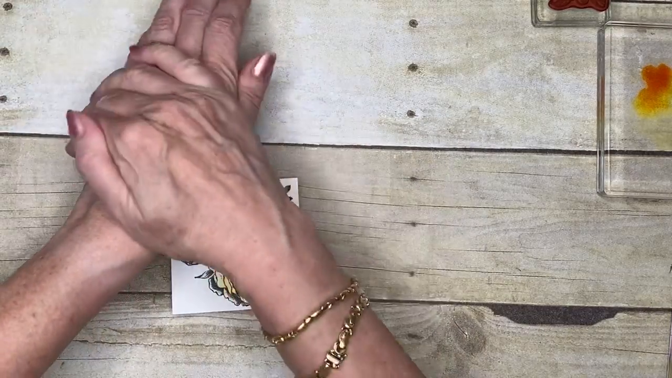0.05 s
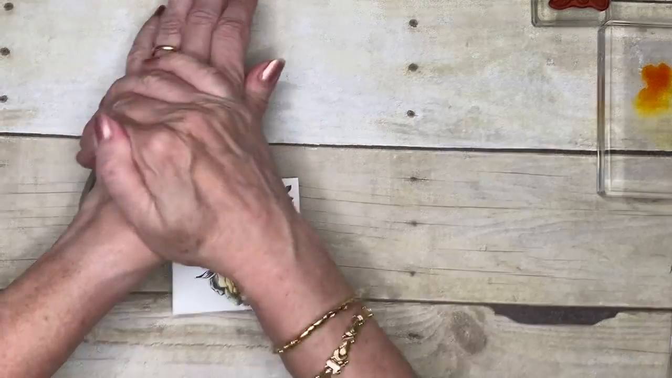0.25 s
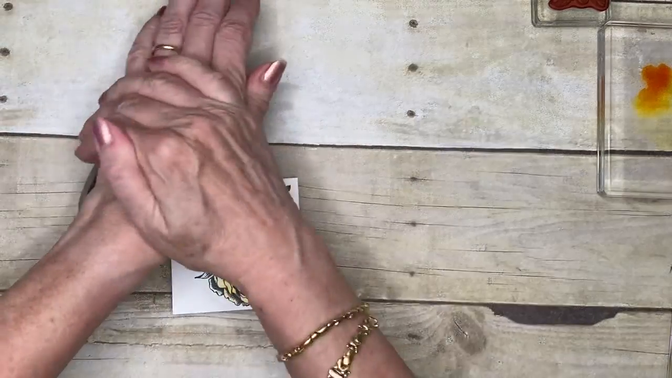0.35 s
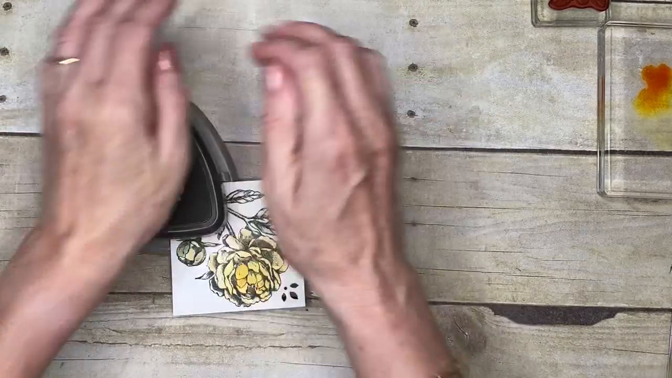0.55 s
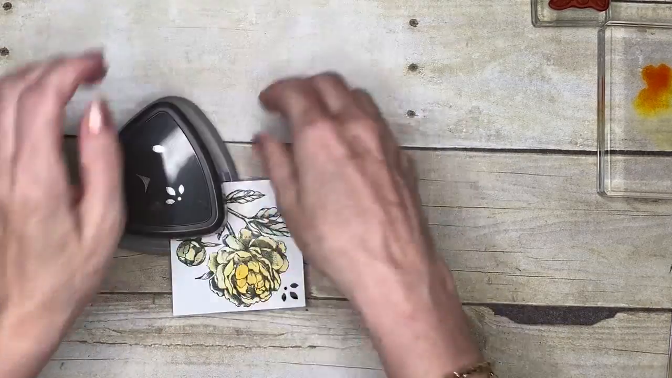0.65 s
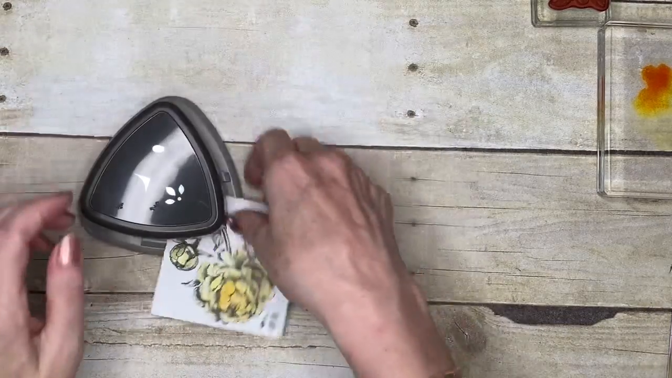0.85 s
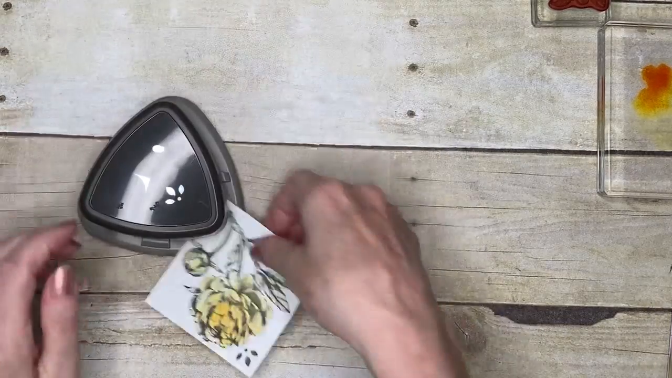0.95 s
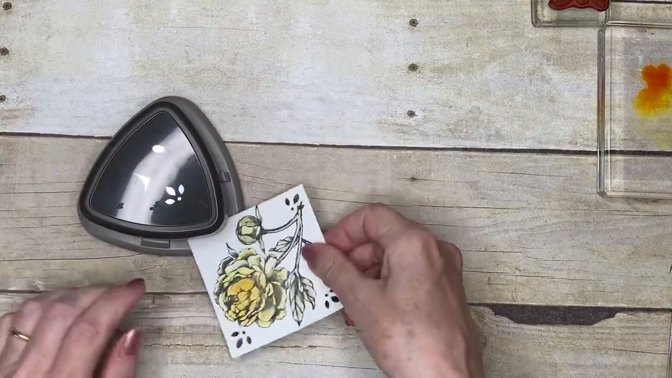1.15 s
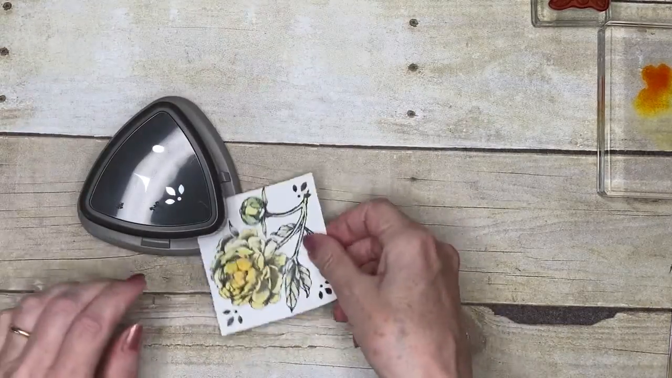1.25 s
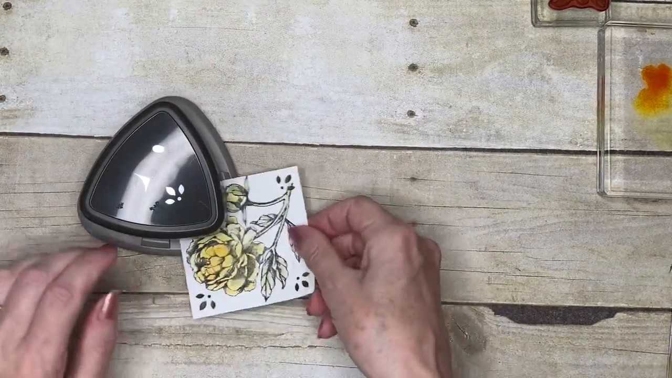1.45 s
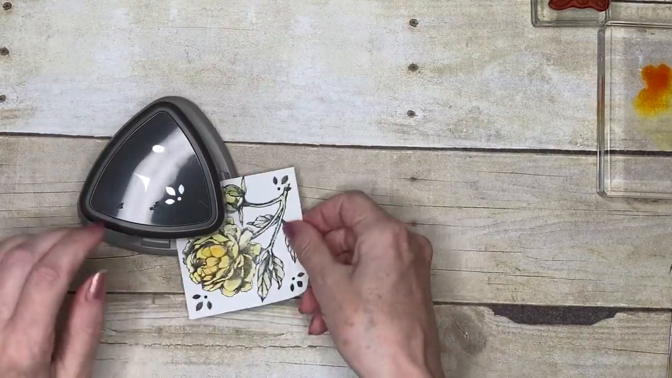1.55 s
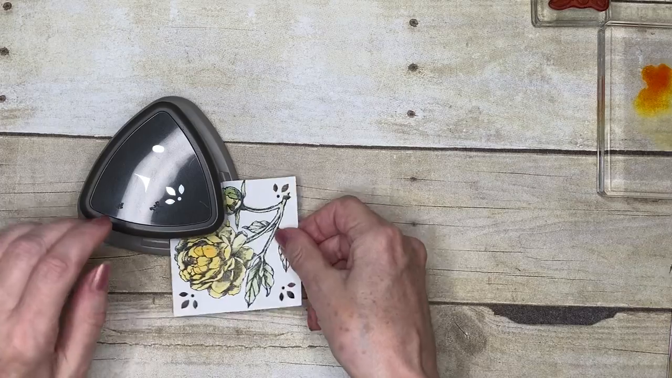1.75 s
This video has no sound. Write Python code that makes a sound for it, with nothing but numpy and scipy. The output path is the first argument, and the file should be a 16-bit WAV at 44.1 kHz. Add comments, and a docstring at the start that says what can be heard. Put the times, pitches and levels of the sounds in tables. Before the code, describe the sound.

One hard, hollow plastic clack with a low wooden thud, a quieter spring-back click, then light papery sliding and tiny edge taps against the punch, heard close in stereo in an indoor room with faint low rumble.

```python
"""Corner punch on a craft table

A plastic corner punch is pressed through a card: the die snaps through, the lever bottoms out and thumps
the table, then springs back while its spring rings faintly. The card is slid out, turned and tapped back in.
Knocks and rubs ring the modes of the plastic shell, pushes boom in the table top, gritty friction drives the
sliding card. A room answers in stereo, over a low rumble and very faint air.
"""
import sys
import numpy as np
from scipy import signal
from scipy.fft import rfft, irfft, next_fast_len
from scipy.io import wavfile
from scipy.ndimage import uniform_filter1d, minimum_filter1d, map_coordinates

SR = 44100
rng = np.random.default_rng(int(sys.argv[2]) if len(sys.argv) > 2 else 0)


def master(y):
    """Save y as 16-bit WAV."""
    cut = np.clip(np.atleast_2d(y).T, -1, 1)
    pcm = np.round(cut * 32767)  # scale
    wavfile.write(sys.argv[1], SR, pcm.astype(np.int16))


N = 79380  # samples, 1.8 s

# ringing modes of the plastic shell: pitch_hz, level_db, t60_s
SHELL_MODES = [(507, -2, 0.027), (759.7, 5, 0.013), (970, 4.5, .02), (1117.4, 1.5, 0.026), (1309, 8, 0.016),
               (1525.5, 2.5, 0.013), (1950, 8.5, 0.01), (2280, 4.5, .018), (2660, 9.5, 0.017),
               (2970, 8, 0.011), (3400, -3.5, 0.025), (3936, -6.5, 0.0055), (4400, -8.5, .008)]
# spectrum of the high hiss of card friction: frequency_hz, level_db
HISS_COLOUR = [(3500, -9.5), (5500, -14.5), (7500, -5), (10500, -5.5), (13000, -11.5), (16500, -10.5)]


def amp(db):
    """dB to gain."""
    return 10 ** (np.asarray(db) / 20)


def unit(x):
    """Scaled to rms 1."""
    return x / np.sqrt(np.mean(x ** 2) + 1e-20)


def along(points, hz):
    """Values at hz, read between (Hz, value) points on a log frequency axis."""
    point_hz, values = np.transpose(points)
    return np.interp(np.log(hz + 1), np.log(point_hz + 1), values)


def closeness(hz, centre_hz, reach_oct):
    """Bell curve around a centre frequency; reach is its standard deviation in octaves."""
    return np.exp(-.5 * (np.log2(hz / centre_hz) / reach_oct) ** 2)


def filtered(x, response):
    """Multiplies the spectrum of x by a complex response of frequency."""
    size = next_fast_len(x.shape[-1] + 8192)
    spectrum = rfft(x, size) * response(np.fft.rfftfreq(size, 1 / SR))
    return irfft(spectrum, size)[..., :x.shape[-1]]


def coloured(points, channels=1):
    """Noise of rms 1 with the given spectrum, cut off below half its lowest point."""
    lowest_hz = points[0][0]
    gain = lambda hz: amp(along(points, hz)) * (hz > lowest_hz / 2)
    return unit(filtered(rng.standard_normal((channels, N)), gain))


def wobble(rate, count):
    """Smooth random curves through rate knots a second."""
    knots = rng.standard_normal((count, int(N * rate / SR) + 4))
    return np.array([map_coordinates(k, [np.arange(N) * rate / SR]) for k in knots])


def background():
    """A low rumble, mostly shared by the channels, and a very faint air in both alike."""
    # spectrum of the rumble: frequency_hz, level_db
    rumble_colour = [(12, -52.5), (20, -8), (65, -1.5), (112, -8), (151, -9.5), (200, -19.5), (235, -28),
                     (276, -25.5), (500, -40.5), (650, -72.5), (1100, -120)]
    # spectrum of the air: frequency_hz, level_db
    air_colour = [(300, -6.5), (1200, -7), (3000, -11.5), (6500, -24), (10000, -12), (13000, -17.5),
                  (16000, -25.5)]
    rumble_db, air_db = -59.5, -74.5
    rumble = coloured(rumble_colour) + 0.15 * coloured(rumble_colour, channels=2)
    return amp(rumble_db) * unit(rumble) + amp(air_db) * coloured(air_colour)


def table():
    """The table top booms after each push: its damped modes near a centre build up and die away."""
    # pushes into the table top: start_s, level_db, centre_hz, reach_oct, direction
    pushes = [(-.012, -31.5, 56, 0.94, 1), (0.0112, -34.5, 175, 0.2, -1), (0.2026, -7, 102, 1.22, -1),
              (0.4181, -22, 165, 0.25, 1), (0.445, -25, 66.5, 0.27, 1), (0.588, -48.5, 69.4, 0.67, 1),
              (0.757, -47.5, 158.6, 0.33, 1), (0.817, -48, 153.4, 0.38, 1)]
    # modes of the table top: pitch_hz, level_db, t60_s
    modes = [(60, 0.5, 0.32), (128.52, 4.5, 0.1), (174.5, 0.5, .15), (222.4, -10, 0.28), (279, -3, .12)]
    rise_s, wander_rad = 0.0058, 0.18
    out = np.zeros(N + 2 * SR)  # a second of lead-in, as the first push starts before zero
    t = np.arange(SR // 2) / SR
    hz, level_db, t60 = np.transpose(modes)[:, :, None]
    for start_s, db, centre_hz, reach_oct, direction in pushes:
        wander = wander_rad * wobble(25, count=len(modes))[:, :len(t)]
        gains = closeness(hz, centre_hz, reach_oct) * amp(level_db - 60 * t / t60)
        boom = np.sum(gains * np.cos(2 * np.pi * hz * t + wander), 0)
        rise = 1 - np.exp(-(t / rise_s) ** 2)
        at = round((start_s + 1) * SR)
        out[at:][:len(t)] += np.sign(direction) * amp(db) * rise * boom
    return out[SR:][:N]


def rubs():
    """Creaks of the lever and scuffs of the card: spiky friction noise drives shell modes near a centre."""
    # creaks and scuffs: start_s, length_s, level_db, growth_db, centre_hz, hiss_db (relative to the rub)
    rub_rows = [(0, 0.019, -62, -3, 1850, -3.5), (0.173, 0.031, -41.5, 14, 1570, -24),
                (0.407, 0.057, -44, 8.5, 2210, -6.5), (.63, .01, -71.5, -7, 4400, 13),
                (0.752, 0.021, -70.5, 9.5, 1400, 11.5), (1.038, .018, -68.5, -3, 1800, 10),
                (0.751, .055, -56.5, -5, 1300, -11), (0.813, 0.03, -52, -15, 985, -14.5),
                (0.93, .11, -60, 1.5, 2357, -27.5), (1.095, 0.046, -58.5, -5.5, 2200, -17),
                (1.355, 0.05, -59.5, -6, 1113, -11), (1.451, 0.052, -69, 11, 1010, -12),
                (1.629, 0.041, -61.5, -2, 2594, -5)]
    reach_oct = 0.19
    out = np.zeros(N + SR)
    hz, _, t60 = np.transpose(SHELL_MODES)[:, :, None]
    t = np.arange(SR // 20) / SR
    hiss = coloured(HISS_COLOUR)[0]
    for start_s, length_s, db, growth_db, centre_hz, hiss_db in rub_rows:
        progress = np.arange(round(length_s * SR)) / (length_s * SR)
        fade = np.clip(np.minimum(progress, 1 - progress) * 10, 0, 1)
        shape = amp(db + growth_db * (progress - .5)) * fade
        near = closeness(hz, centre_hz, reach_oct)
        ring = np.sum(near * amp(-60 * t / t60) * np.sin(2 * np.pi * hz * t), 0)
        drive = rng.standard_normal(len(progress)) ** 3 / np.sqrt(15)  # cubed: spiky, rms near 1
        sound = signal.fftconvolve(shape * drive, ring / np.linalg.norm(ring))
        at = round(start_s * SR)
        sound[:len(progress)] += amp(hiss_db) * shape * hiss[at:at + len(progress)]
        out[at:at + len(sound)] += sound
    return out[:N]


def knocks(rows):
    """Each knock rings the shell modes near its centre and adds a short bright snap."""
    # spectrum of the snap: frequency_hz, level_db
    snap_colour = [(2500, -7), (4000, -4.5), (6000, -13), (8000, -5), (10500, -2.5), (12500, -7.5),
                   (15000, -23.5), (16500, -20)]
    # spectrum of the top of the snap: frequency_hz, level_db
    sizzle_colour = [(9000, -16.5), (12000, -6), (15200, -4.5), (16500, -18)]
    snap_t60, rise_s = 0.011, 0.00093  # the rise is the contact time
    sizzle_db, sizzle_grows = -4, 0.5  # over the snap at a 0 dB blow; dB lost per dB of a weaker blow
    out, t = np.zeros(N + SR), np.arange(SR // 8) / SR
    hz, mode_db, t60 = np.transpose(SHELL_MODES)[:, :, None]
    fizz, sizzle = coloured(snap_colour)[0], coloured(sizzle_colour)[0]
    for start_s, db, centre_hz, reach_oct, snap_db in rows:
        near = closeness(hz, centre_hz, reach_oct)
        gains = near * amp(mode_db + 2 * rng.standard_normal(hz.shape))  # each knock excites them unevenly
        modes = gains * amp(-60 * t / t60) * np.sin(2 * np.pi * hz * t)
        ring = np.sum(modes, 0) / np.linalg.norm(near)
        at = round(start_s * SR)
        bright = fizz + amp(sizzle_db + sizzle_grows * db) * sizzle
        snap = amp(snap_db - 60 * t / snap_t60) * np.roll(bright, -at)[:len(t)]
        out[at:at + len(t)] += amp(db) * (1 - np.exp(-t / rise_s)) * (ring + snap)
    return out[:N]


def spring():
    """Two faint decaying lines of the spring, stopped when the card is pulled."""
    # lines of the spring: pitch_hz, level_db
    lines = [(926, -63), (1007, -62)]
    start_s, rise_s, stop_s, t60, stop_fade_s = .445, .1, .76, 4, 0.0074
    t = np.arange(N) / SR - start_s
    rise = np.clip(t / rise_s, 0, 1) ** 2
    stop = np.clip((stop_s - start_s - t) / stop_fade_s, 0, 1)
    tones = sum(amp(db) * np.sin(2 * np.pi * hz * t) for hz, db in lines)
    return rise * stop * amp(-60 * t / t60) * tones


def slide():
    """Gritty friction of the card excites broad resonances and a high hiss, each part swelling on its own."""
    # course of the sliding card: time_s, scrape_db, hiss_db
    course = [(0.598, -83, -91.5), (.745, -90.5, -92), (0.761, -71.5, -78.5), (.85, -60, -64.5),
              (.9, -64.5, -64), (.95, -64.5, -64), (1.03, -65.5, -69), (1.139, -61, -68.5),
              (1.174, -87.5, -87.5), (1.195, -77, -98), (1.211, -67, -67.5), (1.301, -65, -69),
              (1.38, -59.5, -72), (1.429, -75.5, -88), (1.488, -64, -71), (1.534, -69.5, -80.5),
              (1.575, -69.5, -76), (1.605, -70.5, -96.5), (1.659, -62, -77), (1.71, -92.5, -96),
              (1.8, -98, -95)]
    # resonances of the scrape: centre_hz, width_hz, level_db
    resonances = [(1036, 170, 1.5), (1860, 450, -3.5), (2630, 460, 1), (3993, 2200, -16)]
    # parts of the hiss that swell separately: centre_hz
    patch_hz = np.array([4773, 7700, 12000, 15000])[:, None]
    grit_per_s, grit_db, grit_share = 1500, 3, .6
    flutter_db, flutter_per_s, patch_oct = 4.5, 30, 0.75
    time_s, scrape_db, hiss_db = np.transpose(course)

    grains = rng.random(N) < grit_per_s / SR
    grit = grains * amp(grit_db * rng.exponential(size=N)) * rng.choice([-1, 1], N)
    friction = grit_share * unit(grit) + rng.standard_normal(N)
    flutter = amp(flutter_db * wobble(flutter_per_s, count=len(resonances) + len(patch_hz)))

    centre, width, db = np.transpose(resonances)[:, :, None]
    resonance = lambda f: amp(db) * (1j * f * width / (centre * centre - f * f + 1j * f * width)) ** 2
    scrape = unit(np.sum(filtered(friction, resonance) * flutter[:len(resonances)], 0))

    patch = lambda f: amp(along(HISS_COLOUR, f)) * closeness(f + 1, patch_hz, patch_oct)
    hiss = unit(np.sum(flutter[len(resonances):] * filtered(friction, patch), 0))

    level = lambda level_db: amp(np.interp(np.arange(N) / SR, time_s, level_db, left=-120))
    return level(scrape_db) * scrape + level(hiss_db) * hiss


def room(x):
    """The room answers as a noise tail in which each frequency dies at its own speed."""
    # decay of the room: frequency_hz, t60_s
    decay = [(150, 0.55), (300, .45), (500, .3), (1000, 0.33), (3000, 0.31), (8000, 0.3), (15000, 0.25)]
    # spectrum of the tail: frequency_hz, level_db
    colour = [(60, -33), (150, -6.5), (400, 1.5), (800, -5.5), (1500, -5), (3000, 0), (5000, 4),
              (10000, -4), (15000, 2)]
    # weight of the noise that differs between channels, beside shared noise of 1: frequency_hz, share
    apart = [(100, 0.15), (300, 0.97), (2000, 1), (5000, 0.92), (7000, .15)]
    hz, t, noise = signal.stft(rng.standard_normal((3, SR // 2)), SR, nperseg=256)
    stereo = noise[0] + along(apart, hz)[:, None] * noise[1:]
    fall_db = along(colour, hz)[:, None] - 60 * t / along(decay, hz)[:, None]
    tail = signal.istft(stereo * amp(fall_db), SR, nperseg=256)[1]
    delayed = np.pad(x, (200, 0))[None]  # 200 samples, 4.5 ms
    return signal.fftconvolve(delayed, tail / np.linalg.norm(tail[0]), axes=1)[:, :N]


def scene():
    """Punch, card and table up close, the room's answer and the background."""
    # contacts of lever, die and shell: start_s, level_db, centre_hz, reach_oct, snap_db (relative)
    contacts = [(.0095, -31.5, 1204, 0.72, -11.5), (.018, -53.5, 1260, 0.59, -26.5),
                (.088, -63.5, 1490, 0.73, -10.5), (.194, -29.5, 1560, 0.067, -33.5),
                (.1993, -4, 1605, 0.11, -26), (.2012, -9.5, 2600, 0.53, -15),
                (.2018, -6.5, 1204, 0.49, -11.5), (.204, -8.5, 1130, 0.27, -19),
                (.2058, -1, 1370, 0.36, -7.5), (.2086, 0.5, 615, 0.49, -12.5), (.416, -28, 780, .4, -26),
                (.4396, -15, 950, 0.23, -18.5), (.4422, -11, 775, 0.22, -18.5),
                (.4447, -11.5, 902, 0.9, -7), (.449, -18, 1050, 0.47, -16)]
    # taps of the card's edge on the punch: start_s, level_db, centre_hz, reach_oct, snap_db (relative)
    taps = [(.753, -37, 1250, 0.13, -8.5), (.813, -33, 1070, 0.1, -17), (.826, -37.5, 950, 0.45, -15),
            (.856, -43.5, 3100, 0.17, -17.5), (.927, -38.5, 2600, 0.23, -7.5), (.93, -45, 975, 0.47, -26.5),
            (1.048, -47, 1800, 0.26, -20), (1.0905, -27.5, 2275, 0.26, -23),
            (1.094, -31.5, 1169, 0.15, -17), (1.1, -54.5, 2397, 0.19, -19),
            (1.146, -43.5, 593, 0.71, -25.5), (1.323, -45, 1980, 0.15, -20), (1.364, -45, 1600, .7, -25.5),
            (1.3905, -34, 1592, 0.43, -38), (1.495, -47, 985, 0.21, -34.5), (1.637, -46, 2337, 0.76, -7),
            (1.791, -36.5, 2000, 1, -7)]
    room_db, table_room_db = -10, -7.5  # sends to the room
    near = knocks(contacts) + knocks(taps) + rubs() + slide()
    boom = table()
    answer = room(amp(room_db) * near + amp(table_room_db) * boom)
    return near + boom + spring() + answer + background()


def record(dry):
    """The recorder's stereo processing turns the phase between channels; low cut, limiter, band limit."""
    # level of left over right: frequency_hz, balance_db
    balance = [(60, 2), (250, 1), (2000, -1.1), (12000, -0.5)]
    # phase by which right leads left: frequency_hz, lead_rad
    right_leads = [(0, 0), (1000, .45), (3000, 1.2), (4500, 1.6), (6400, -3.14), (16600, -22.0)]
    low_cut_hz, top_hz = 36, 16600
    limit_db, limit_hold_s = -1, .003
    side = np.array([[.5], [-.5]])  # left and right each take half the difference
    lead_hz, lead_rad = np.transpose(right_leads)
    turn = lambda hz: np.exp(-1j * side * np.interp(hz, lead_hz, lead_rad))  # most in the treble
    stereo = lambda hz: amp(side * along(balance, hz)) * turn(hz)
    low_cut = lambda hz: hz ** 2 / (hz ** 2 - low_cut_hz ** 2 - 1.4j * hz * low_cut_hz)
    x = filtered(dry, lambda hz: stereo(hz) * low_cut(hz))

    hold = round(limit_hold_s * SR)
    needed = np.minimum(1, amp(limit_db) / (np.abs(x).max(0) + 1e-9))
    limited = x * uniform_filter1d(minimum_filter1d(needed, hold), hold)
    return filtered(limited, lambda hz: hz < top_hz)


dry = scene()
out = record(dry)
master(out)
```